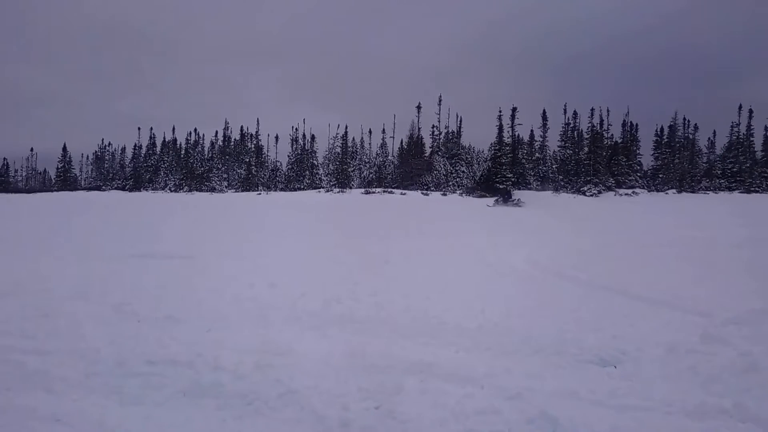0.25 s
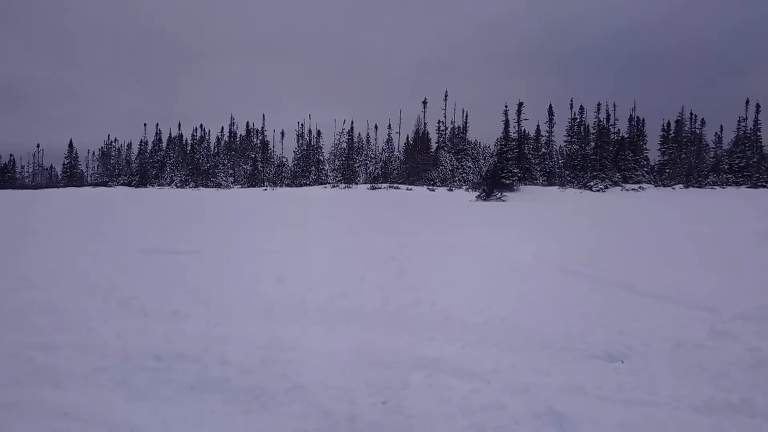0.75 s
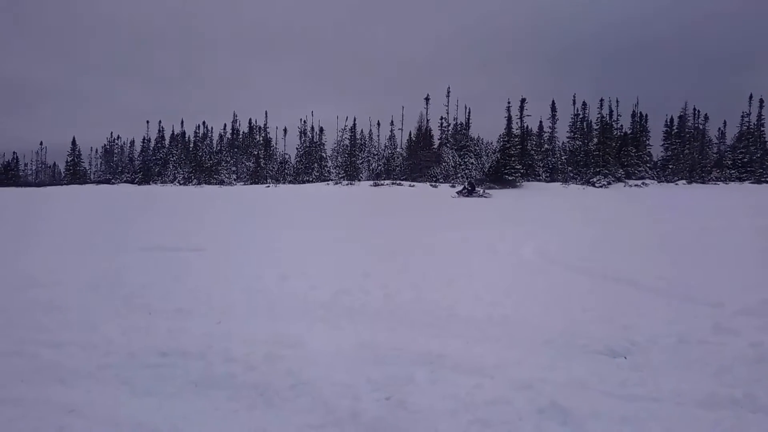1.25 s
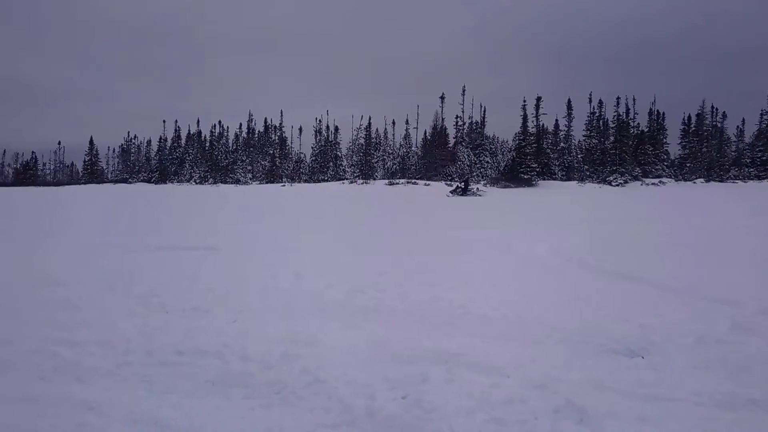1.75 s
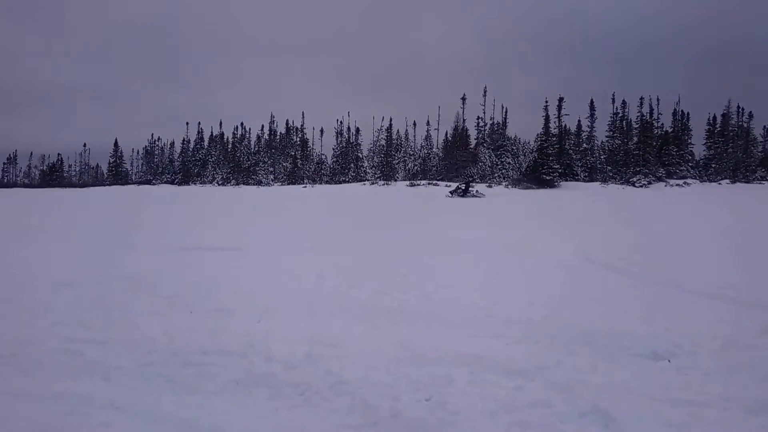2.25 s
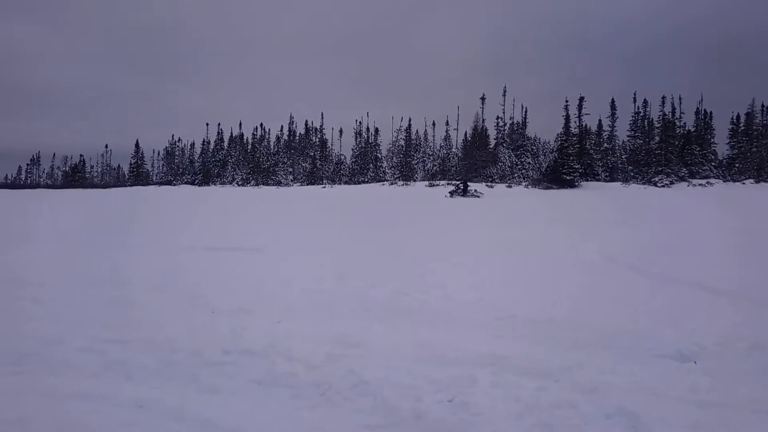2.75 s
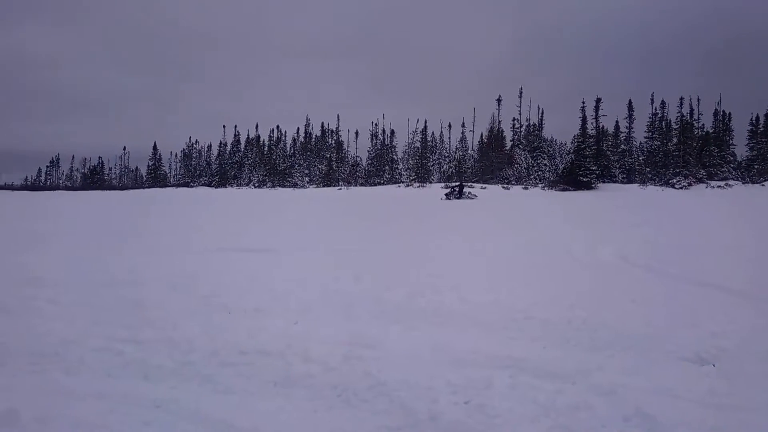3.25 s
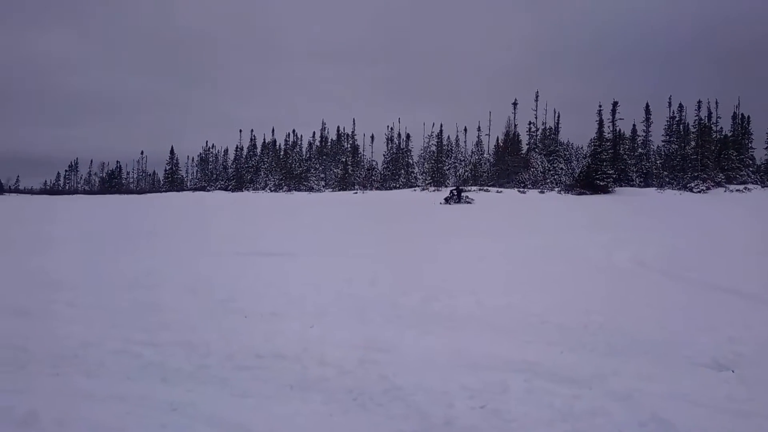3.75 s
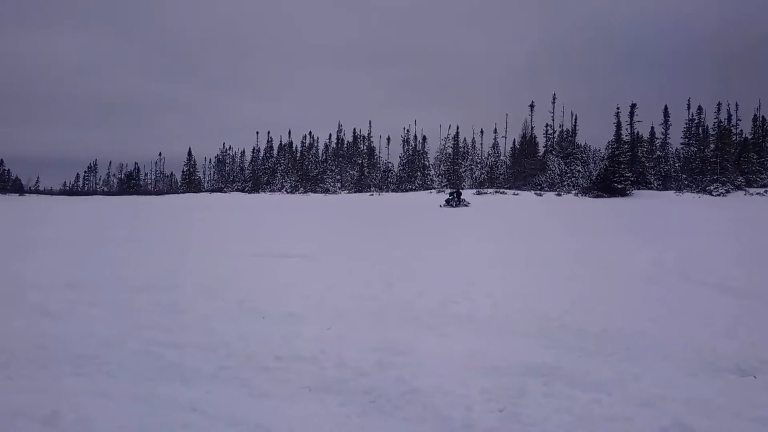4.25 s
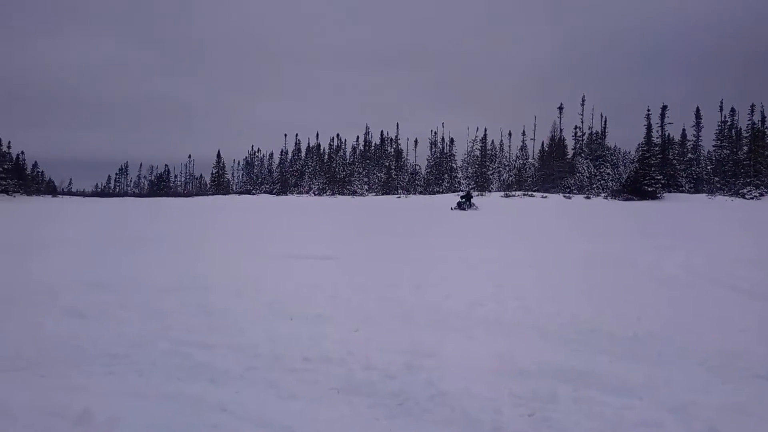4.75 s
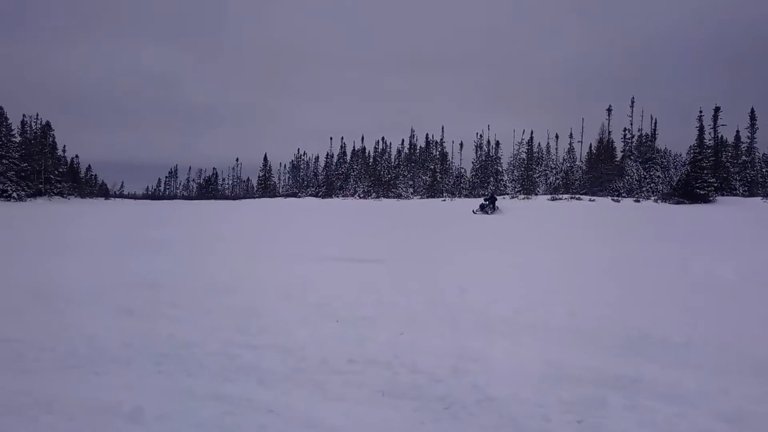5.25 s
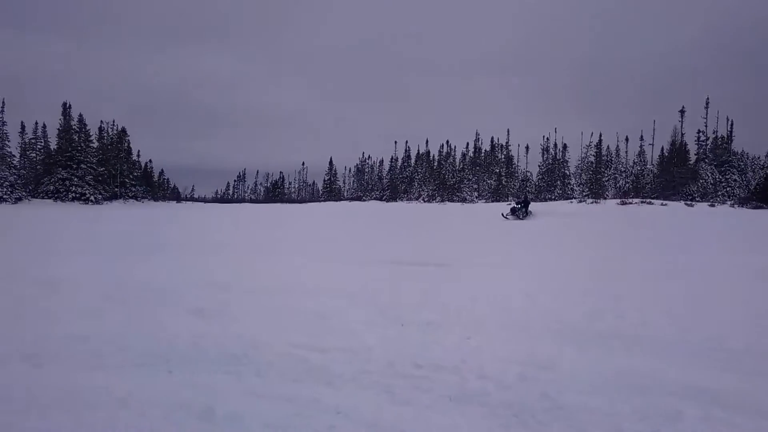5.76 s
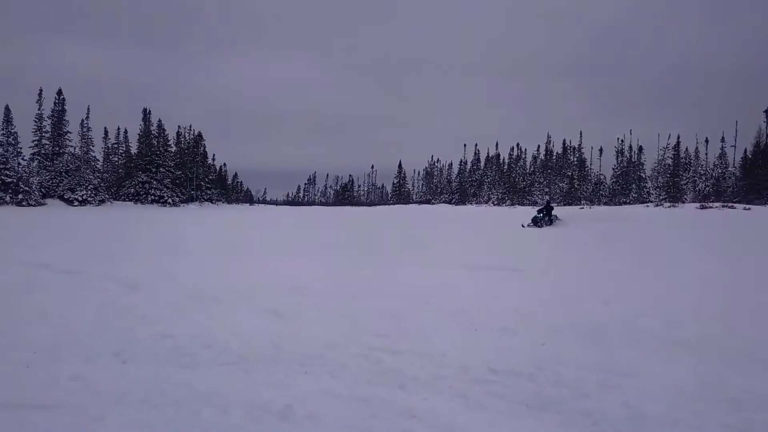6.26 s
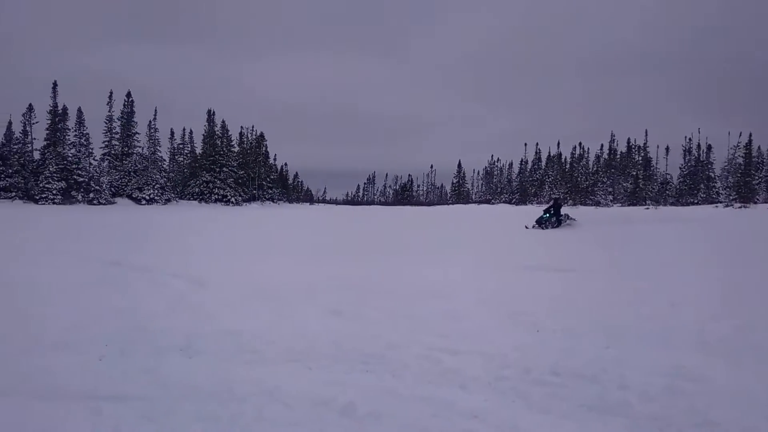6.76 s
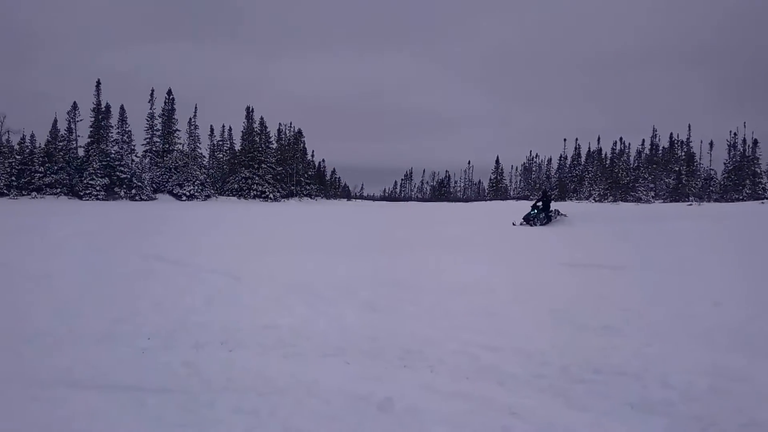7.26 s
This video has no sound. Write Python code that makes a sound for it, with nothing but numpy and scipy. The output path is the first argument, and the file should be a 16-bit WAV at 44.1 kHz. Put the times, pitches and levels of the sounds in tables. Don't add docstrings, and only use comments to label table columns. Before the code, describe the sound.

Outdoors on an open snowy field, a far two-stroke snowmobile idles faintly and gives seven soft, breathy throttle blips, about one a second. Near five seconds it revs hard twice, a piercing, crackling buzz, the second louder, then shuts off abruptly and runs down. Low wind bumps hit the microphone, strongest around the revs. Dull echoes return from the trees, heavier on the right. Stereo, thin and bright, with faint hiss.

```python
import sys
import numpy as np
from scipy import signal
from scipy.fft import rfft, irfft, next_fast_len
from scipy.io import wavfile
from scipy.ndimage import uniform_filter1d, minimum_filter1d

SR = 44100
rng = np.random.default_rng(int(sys.argv[2]) if len(sys.argv) > 2 else 0)


def generate_wav(signal):
    frames = np.transpose(np.atleast_2d(signal))
    scaled = np.clip(frames, -1, 1) * 32767
    pcm = np.round(scaled).astype(np.int16)
    wavfile.write(sys.argv[1], SR, pcm)


def volts_from_db(level):
    exponent = np.asarray(level, float) / 20
    return 10 ** exponent


N = 331191


def unit(x):
    return x / np.sqrt(np.mean(x ** 2, axis=-1, keepdims=True) + 1e-20)


def noise(*shape):
    return rng.standard_normal(shape or N)


def in_time(rows):
    s, *columns = np.transpose(rows)
    return [np.interp(np.arange(N) / SR, s, c) for c in columns]


def butter(x, hz, kind, order=2):
    return signal.sosfilt(signal.butter(order, hz, kind, fs=SR, output="sos"), x)


def drift(hz):
    sos = signal.butter(2, hz, fs=SR / 20, output="sos")
    slow = signal.sosfilt(sos, noise(N // 20 + 2002))[2000:]
    return np.interp(np.arange(N) / 20, np.arange(len(slow)), unit(slow))


def late(x, seconds):
    lag = round(seconds * SR)
    return np.concatenate([np.zeros(lag), x[:N - lag]])


def swell(floor_db, *events):
    t = np.arange(0, N + 64, 64) / SR
    lines = []
    for s, db, rise, fall, *held in events:
        before = np.maximum(s - t, 0)
        after = np.maximum(t - s - sum(held), 0)
        lines.append(db - rise * before - fall * after)
    return np.interp(np.arange(N) / SR, t, np.maximum(floor_db, np.max(lines, axis=0)))


# f/Hz, level/dB per Hz
WIND_COLOUR = [(15, -39), (25, -36), (44, 10.5), (81, 9.5), (173, -8.5), (195, -25), (348, -23),
               (420, -31.5), (550, -83), (920, -120)]
# t/s, level/dB, left minus right/dB
GUSTS = [(.0, -61, -8), (.11, -59, 17), (.29, -61, 13), (.44, -57, 17), (.58, -58.5, 9), (.7, -59, 15),
         (1.09, -60.5, 19), (1.29, -57, 5), (1.42, -57.5, 8), (1.75, -60, 10), (2.05, -61.5, 19),
         (2.17, -59, 13.5), (2.78, -61.5, 11), (3.2, -58, 20), (3.34, -58.5, 18), (3.53, -57.5, 17),
         (3.84, -61.5, 8), (4.29, -60.5, 15), (4.64, -62.5, 20.5), (4.83, -60.5, 24), (5.0, -54, -8),
         (5.45, -54, -1), (5.54, -52, -14), (5.71, -45.5, -11), (5.9, -48.5, 3), (6.18, -49, -12),
         (6.26, -44, -10), (6.34, -46, -5), (6.47, -51, -9.5), (7.45, -58, -1)]
BREEZE_DB, BREEZE_PAN_DB = -68, 3.5
GUST_RISE, GUST_FALL = 190, 132


def wind():
    size = next_fast_len(N)
    hz = np.arange(size // 2 + 1) * SR / size + 1
    table = np.transpose(WIND_COLOUR)
    colour = volts_from_db(np.interp(np.log(hz), np.log(table[0]), table[1]))
    ports = []
    for side in (.5, -.5):
        gusts = [(s, db + side * pan_db, GUST_RISE, GUST_FALL) for s, db, pan_db in GUSTS]
        gust_db = swell(BREEZE_DB + side * BREEZE_PAN_DB, *gusts)
        gust_db = gust_db + 2.5 + 2.0 * drift(20)
        air = irfft(rfft(noise(size)) * colour, size)[:N]
        air = unit(butter(air, 35, "high"))
        lumps = np.sqrt(np.abs(uniform_filter1d(air ** 2, size=2000)))
        air = air / (0.27 + lumps)
        spatter = unit(butter(noise(), [90, 300], "band"))
        ports.append(air * volts_from_db(gust_db) + spatter * volts_from_db(1.7 * (gust_db + 50) - 64.5))
    return np.array(ports)


# opens t/s, climb/s, top firing rate f/Hz, rush level/dB, held/s
BLIPS = [
    (.09, .24, 186, -46.5, 0.0029),
    (.96, 0.25, 193, -47.5, .0),
    (1.78, .28, 199, -45, 0.0029),
    (2.63, .29, 202, -44, .0),
    (3.55, .25, 192, -45.5, .0),
    (4.06, .19, 188, -46, 0.0027),
    (4.44, .18, 215, -40.5, .2),
]
# t/s, firing rate f/Hz
FIRST_REV = [
    (4.82, 213.6),
    (4.88, 229.2),
    (5.02, 270.7),
    (5.07, 280.6),
    (5.13, 281.2),
    (5.18, 271.6),
    (5.25, 251.3),
    (5.29, 244.3),
    (5.33, 242.3),
]
SECOND_REV = [
    (5.4, 248.2),
    (5.46, 256.6),
    (5.52, 268.3),
    (5.57, 274.8),
    (5.64, 278.2),
    (5.845, 282),
    (5.88, 275),
    (5.98, 231.8),
    (6.16, 177),
]
START_HZ, IDLE_HZ, SAG_S = 118, 108, .3
STALL_HZ, RUNDOWN_S = 70, .88


def speed():
    t = np.arange(N) / SR
    rate = np.full(N, 1. * START_HZ)
    for opens, climb, top_hz, db, held in BLIPS:
        start = rate[int(opens * SR)]
        climbed = np.sin(np.pi / 2 * np.clip((t - opens) / climb, 0, 1)) ** 2
        up = start + (top_hz - start) * climbed
        shut_for = np.maximum(t - opens - climb - held, 0)
        sag = IDLE_HZ + (top_hz - IDLE_HZ) * np.exp(-shut_for / SAG_S)
        rate = np.where(t < opens, rate, np.minimum(up, sag))
    rate = np.where(t < FIRST_REV[0][0], rate, in_time(FIRST_REV + SECOND_REV)[0])
    end, end_hz = SECOND_REV[-1]
    rundown = STALL_HZ + (end_hz - STALL_HZ) * np.exp((end - t) / RUNDOWN_S)
    return np.where(t < end, rate, rundown)


# t/s, exhaust crack level/dB, silencer growl level/dB
FIRST_LOAD = [
    (4.81, -49, -58),
    (4.91, -35, -46.5),
    (4.98, -25, -40),
    (5.15, -20.5, -34.5),
    (5.2, -25, -31.5),
    (5.215, -27.5, -33),
    (5.235, -48, -35.5),
    (5.27, -46, -37.5),
]
SECOND_LOAD = [
    (5.4, -32, -33),
    (5.47, -24.5, -30),
    (5.54, -23.5, -34),
    (5.66, -21.5, -36.5),
    (5.83, -12.5, -22),
    (5.895, -22.5, -26.5),
    (5.92, -39.5, -36.5),
    (6.02, -33, -58),
    (6.15, -70.5, -72),
]
RUSH_IDLE_DB, RUSH_LEAD_S, RUSH_RISE, RUSH_FALL = -59.5, 0.068, 100, 34.2
FAR_DB, NEARING_DB_PER_S, CRACK_FOLLOWS = -71.5, 2.5, 0.51
HUM_IDLE_DB, HUM_UNDER_DB, HUM_RISE, HUM_FALL = -92, 18, 44, 300
GROWL_IDLE_DB, GROWL_UNDER_DB, GROWL_RISE, GROWL_FALL = -76, 17.5, 68, 70
# loudest t/s, level/dB, rise/dB per s, fall/dB per s
COAST_CRACK, COAST_RUSH = (6.5, -46.5, 47, 14), (6, -35, 90, 42)
COAST_HUM, COAST_GROWL = (6.4, -62, 30, 4), (7, -60.5, 36, 4)
FULL_LOAD_DB = -22
HUM_UNDER_CRACK_DB, HUM_SURGE = 31, .9


def loads():
    t = np.arange(N) / SR
    tops = [(opens + climb, db, held) for opens, climb, top_hz, db, held in BLIPS]
    rushes = [(s - RUSH_LEAD_S, db, RUSH_RISE, RUSH_FALL) for s, db, held in tops]
    hums = [(s - .03, db - HUM_UNDER_DB, HUM_RISE, HUM_FALL, held) for s, db, held in tops]
    growls = [(s - .04, db - GROWL_UNDER_DB, GROWL_RISE, GROWL_FALL) for s, db, held in tops]
    rush = swell(RUSH_IDLE_DB, COAST_RUSH, *rushes)
    hum = swell(HUM_IDLE_DB, COAST_HUM, *hums)
    tones = swell(GROWL_IDLE_DB, COAST_GROWL, *growls)
    hard = (t > FIRST_LOAD[0][0]) & (t < SECOND_LOAD[-1][0])
    hard_crack, hard_growl = (np.where(hard, c, -99) for c in in_time(FIRST_LOAD + SECOND_LOAD))
    blip_crack = FAR_DB + NEARING_DB_PER_S * t + CRACK_FOLLOWS * (rush - RUSH_IDLE_DB)
    crack = np.where(t < FIRST_LOAD[0][0], blip_crack, hard_crack)
    crack = np.maximum(crack, swell(-99, COAST_CRACK))
    surge = HUM_SURGE * np.maximum(hard_crack - FULL_LOAD_DB, 0)
    hard_hum = np.maximum(hard_crack, hard_growl) - HUM_UNDER_CRACK_DB + surge
    return crack, np.maximum(rush, hard_growl + 11), np.maximum(hum, hard_hum), np.maximum(tones, hard_growl)


def exhaust_rush(phase, rush_db):
    puff = 1 + 0.21 * np.cos(phase - .8)
    rush = unit(butter(noise(), [800, 5000], "band", order=1)) * puff
    return rush * volts_from_db(np.minimum(rush_db, -36) - 7.5 + 1.5 * drift(9.2))


def snow_spray(crack_db):
    spray = unit(butter(noise(), 4300, "high")) * volts_from_db(np.minimum(crack_db, -42) - 2.0)
    finest = unit(butter(noise(), 15200, "high", order=4))
    return spray + finest * volts_from_db(np.minimum(crack_db, -50) + 8.5)


# multiple of firing rate, level/dB, left port level/dB
HUM = [(1, -3, -9), (2, -4.5, -9)]
HUM_PEAK_HZ, HUM_WIDTH_OCT, HUM_PEAK_DB = 320, 0.48, 8
OCTAVE_SURGE_DB = 9


def engine_hum(rate, phase, hum_db, crack_db, turned):
    octave_db = OCTAVE_SURGE_DB * turned * np.clip((crack_db - FULL_LOAD_DB) / 2, 0, 1)
    hum = 0
    for k, db, left_db in HUM:
        octaves_off = np.log2(k * rate / HUM_PEAK_HZ)
        boom_db = HUM_PEAK_DB * np.exp(-(octaves_off / HUM_WIDTH_OCT) ** 2)
        tone = volts_from_db(hum_db + db + boom_db + (k - 1) * octave_db) * np.sin(k * phase)
        hum = hum + tone * [[-volts_from_db(left_db)], [1]]
    return hum


# f/Hz, level/dB
PIPE = [(300, -5), (560, -10), (700, -8), (880, -1), (1100, 3), (1400, -7), (1700, -10.5)]


def growl(rate, phase, level_db):
    hz, db = np.transpose(PIPE)

    def through(k):
        passed_db = np.interp(np.log(k * rate[::32]), np.log(hz), db, right=-40)
        return np.repeat(volts_from_db(passed_db), 32)[:N]

    coasting = 1. * (np.gradient(rate) < 0) * (rate < 205)
    level_db = level_db - 9 * uniform_filter1d(coasting, size=2000)
    level_db = level_db + 4 * np.clip((230 - rate) / 40, 0, 1) * drift(12)
    orders = 0
    for k in (2.5, 3, 3.5, 4, 5, 5.5, 6, 7):
        strength = volts_from_db(1.5 * drift(10) - 13 * (k % 1 > 0))
        orders = orders + through(k) * strength * np.sin(k * phase + k * k)
    return volts_from_db(level_db + 3) * orders / np.hypot(through(3), through(4))


def firings(rate, width_s, jitter_s, uneven_db, twin_db):
    cycles = np.cumsum(rate) / SR
    index = np.round(cycles).astype(int)
    chance = noise(N // 100, 2)[index]
    u = ((cycles - index) / rate - jitter_s * chance[:, 0]) / width_s
    size = volts_from_db(uneven_db * chance[:, 1] + twin_db * (index % 2))
    return unit(-size * u * np.exp(-u * u / 2) / np.sqrt(rate))


def cavity(x, peaks):
    for hz, width, db in peaks:
        middle = -2 * np.cos(2 * np.pi * hz / SR)
        gain = volts_from_db(db / 2)
        spread = np.tan(np.pi * width / SR)
        zeros = [1 + spread * gain, middle, 1 - spread * gain]
        poles = [1 + spread / gain, middle, 1 - spread / gain]
        x = signal.lfilter(zeros, poles, x)
    return x


def exhaust_crack(rate, crack_db, turned):
    idle = np.clip(-24.5 - crack_db, 0, 12)
    crack = firings(rate, width_s=2.6e-5, jitter_s=3e-6 * (1 + 3.5 * idle), uneven_db=.7 + .2 * idle, twin_db=.8)
    turbulence = unit(butter(noise(), [2000, 12000], "band"))
    crack = crack + .22 * volts_from_db(2.5 * drift(15)) * turbulence
    crack = butter(crack, 1310, "high", order=3) * volts_from_db(crack_db + 3.5 - 1.18 * idle)
    away = cavity(crack, [(4450, 1300, 3.5), (8200, 2700, -4)])
    facing = cavity(crack, [(4452, 1310, -3.5), (8300, 2500, 1.5)])
    return (1 - turned) * away + turned * facing


TURN_S, TURN_TAKES_S = 5.306, .25


def engine():
    rate = uniform_filter1d(speed(), size=1300)
    crack_db, rush_db, hum_db, growl_db = loads()
    phase = 2 * np.pi * np.cumsum(rate) / SR
    turned = np.clip((np.arange(N) / SR - TURN_S) / TURN_TAKES_S, 0, 1)
    rush = exhaust_rush(phase, rush_db) + snow_spray(crack_db)
    hum = engine_hum(rate, phase, hum_db, crack_db, turned)
    tones = growl(rate, phase, growl_db)
    return hum, tones, exhaust_crack(rate, crack_db, turned), rush


# delay t/s, smear/s, left level/dB, right level/dB, top f/Hz
TREES = [
    (0.059, 0.076, -36, -19.5, 5660),
    (0.162, 0.047, -20, -20, 5270),
    (0.238, 0.043, -45, -11.5, 2580),
    (0.332, .04, -26, -15, 2040),
    (.43, 0.052, -10.5, -7, 1250),
    (0.581, 0.065, -40, -24.5, 2260),
]


def tree_line(x):
    lag, response = np.arange(SR) / SR, 0
    for delay, smear_s, left_db, right_db, top_hz in TREES:
        trunks = noise(SR) + 0.28 * noise(2, SR)
        shape = np.exp(-((lag - delay) / smear_s) ** 2 / 2) * (lag > .005) / np.sqrt(smear_s * SR)
        echo = butter(trunks * shape, top_hz, "low", order=4)
        response = response + volts_from_db(np.array([[left_db], [right_db]])) * echo
    return signal.fftconvolve(x[None], response, axes=1)[:, :N]


def smear(x, spots):
    for hz, width in spots:
        r = np.exp(-np.pi * width / SR)
        a = [1, -2 * r * np.cos(2 * np.pi * hz / SR), r * r]
        x = signal.lfilter(a[::-1], a, x)
    return x


# f/Hz, width/Hz, level/dB
LEFT_PORT = [(1110, 560, -3.5), (2400, 1020, -7.5), (4170, 580, 5), (5260, 220, -3.5), (6320, 1860, 8),
             (7030, 1600, 0), (8600, 750, 4.5)]
RIGHT_PORT = [(1013, 185, 6.5), (1640, 1004, 9.5), (2618, 250, 7.5), (3103, 627, 14.5), (4650, 960, 9),
              (5010, 120, -11), (5960, 900, 4.5), (7900, 5600, -7.5), (7330, 220, 7.5)]
# f/Hz, width/Hz
LEFT_SMEAR = [(6000, 500), (7200, 500), (8600, 600)]
RIGHT_SMEAR = [(1700, 700), (2700, 500), (3000, 450), (4300, 700), (6000, 900)]


def port_pair(left, right):
    left = cavity(smear(left, LEFT_SMEAR), LEFT_PORT)
    right = cavity(smear(right, RIGHT_SMEAR), RIGHT_PORT)
    return butter(np.array([left, right]), 730, "high", order=3)


SNOW_BOUNCE_S, RIGHT_LAG_S = .0015, .00064
LEFT_BOUNCE_S = .000756


def scene():
    hum, tones, crack, rush = engine()
    direct = crack + rush
    grounded = direct - .6 * late(direct, SNOW_BOUNCE_S)
    scattered = 0.42 * unit(noise(2, N)) * np.sqrt(uniform_filter1d(rush ** 2, size=800))
    left, right = tree_line(direct + 0.26 * tones) + butter(scattered, 8200, "low", order=1)
    left = left + direct - 0.45 * late(crack, LEFT_BOUNCE_S) - 0.61 * late(rush, SNOW_BOUNCE_S)
    right = right - 0.87 * late(0.79 * direct + 0.51 * grounded, RIGHT_LAG_S)
    low = hum + np.array([volts_from_db(-9.0) * tones, -late(tones, RIGHT_LAG_S / 3)])
    hiss = volts_from_db(-53.5) * butter(noise(2, N), 2500, "low", order=1)
    return port_pair(left, right) + low + wind() + hiss


def band_limit(x):
    return signal.sosfilt(signal.butter(12, 15610, fs=SR, output="sos"), x)


SHELF_HZ, SHELF_EDGE_HZ, SHELF_DB = 9640, 220, -18.5


def record(dry):
    wide = dry - 0.25 * butter(dry[::-1], 1250, "low", order=1)
    size = next_fast_len(N)
    hz = np.arange(size // 2 + 1) * SR / size
    shelf_db = SHELF_DB / 2 * (1 + np.tanh((hz - SHELF_HZ) / SHELF_EDGE_HZ / 2))
    shelved = irfft(rfft(wide, size) * volts_from_db(shelf_db), size)[:, :N]
    room_left = minimum_filter1d(np.minimum(1, .86 / (np.abs(shelved) + 1e-9)), size=330)
    limited = shelved * uniform_filter1d(room_left, size=330)
    steep = signal.cheby2(12, 70, 15600, fs=SR, output="sos")
    return band_limit(signal.sosfilt(steep, limited))


dry = scene()
out = record(dry)
generate_wav(out)
```